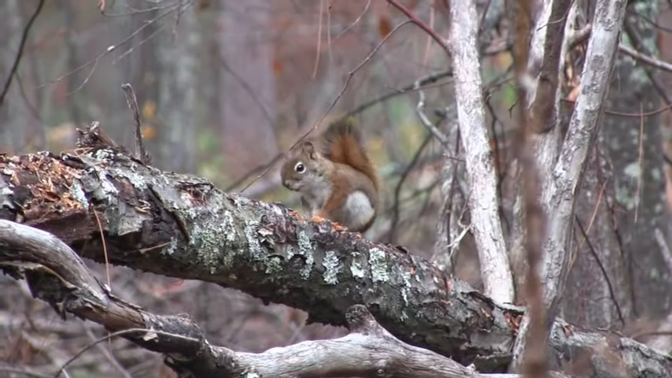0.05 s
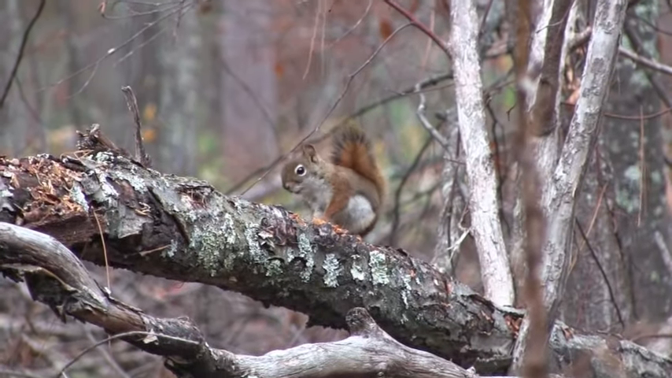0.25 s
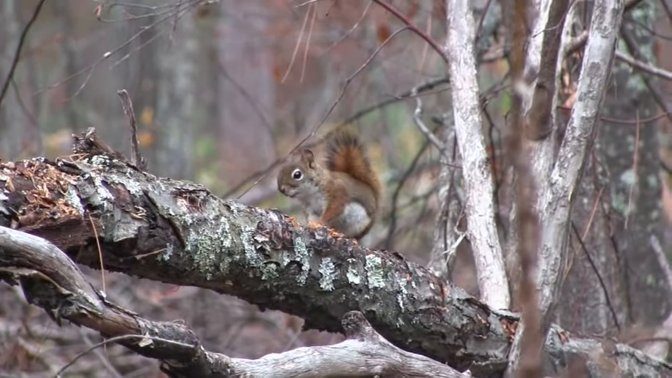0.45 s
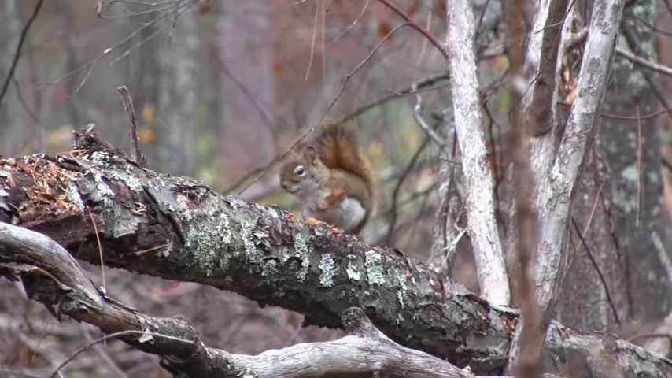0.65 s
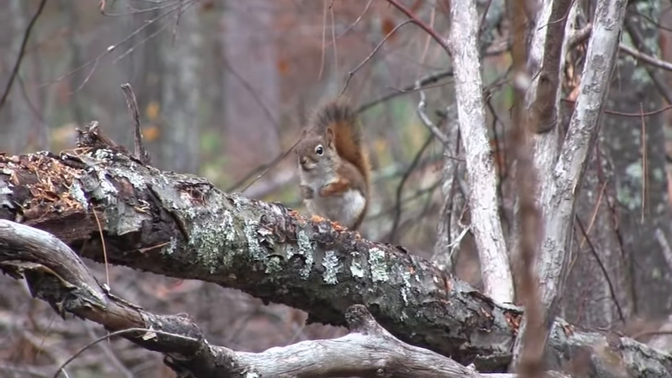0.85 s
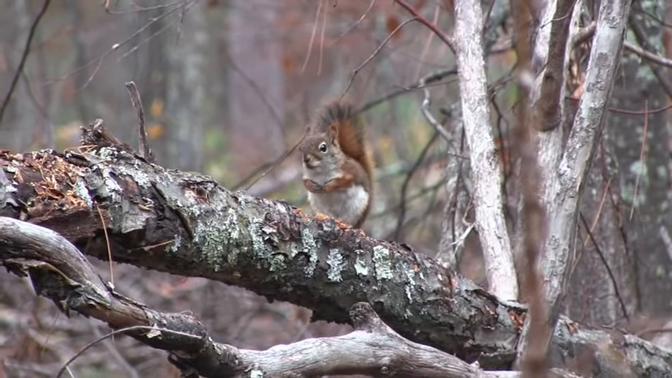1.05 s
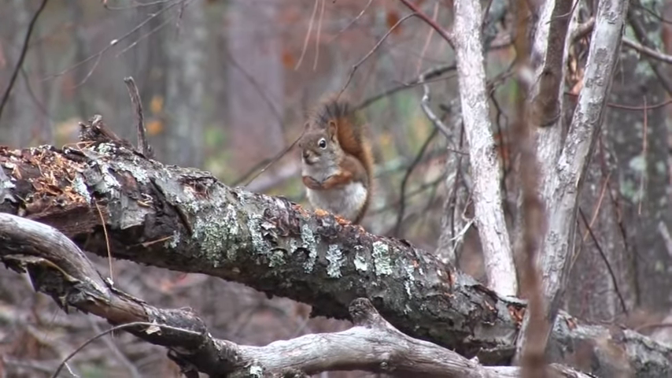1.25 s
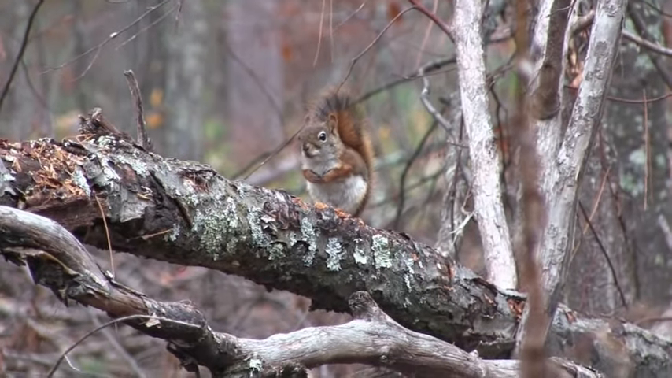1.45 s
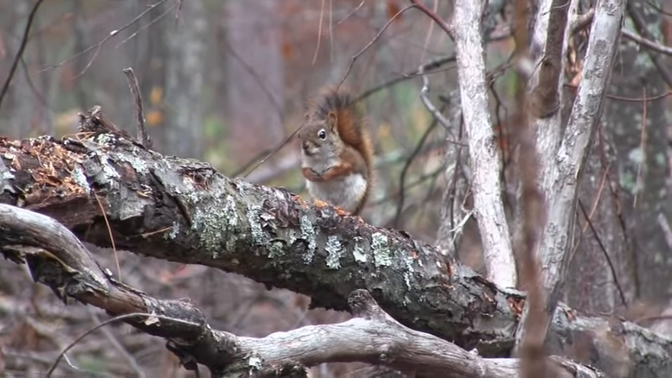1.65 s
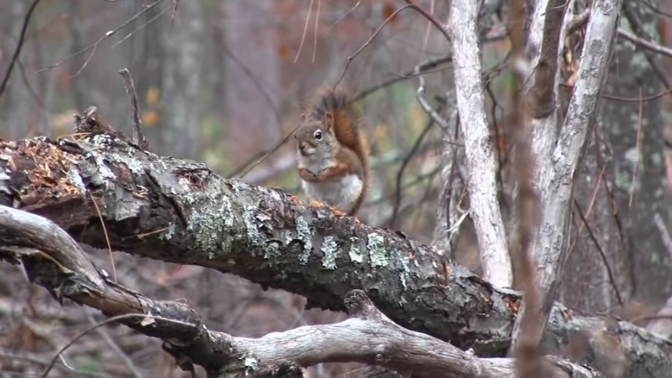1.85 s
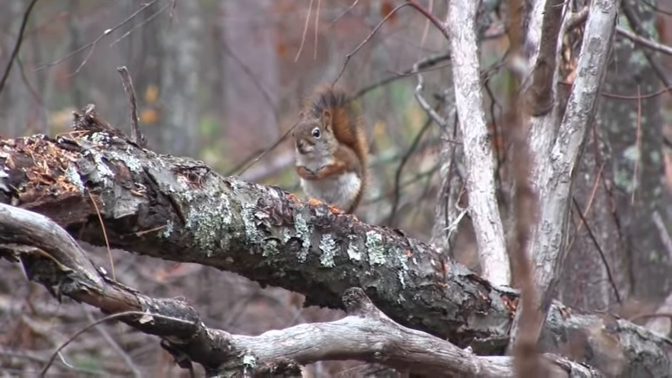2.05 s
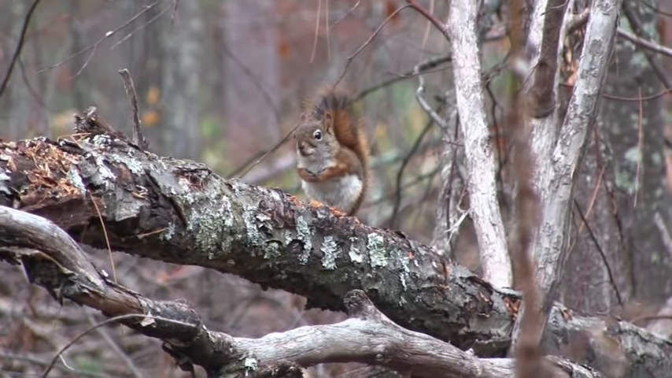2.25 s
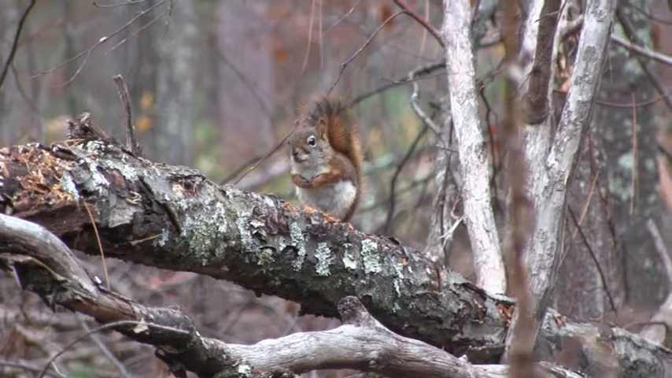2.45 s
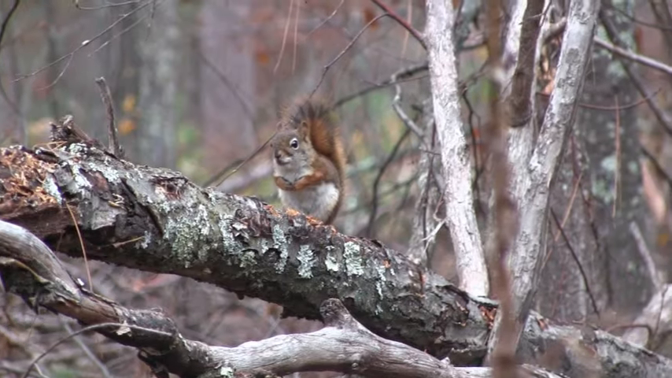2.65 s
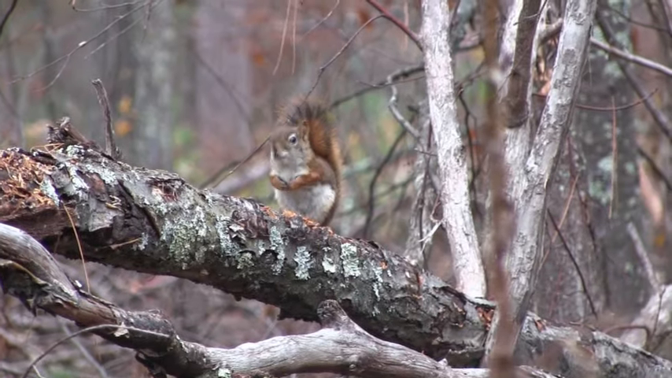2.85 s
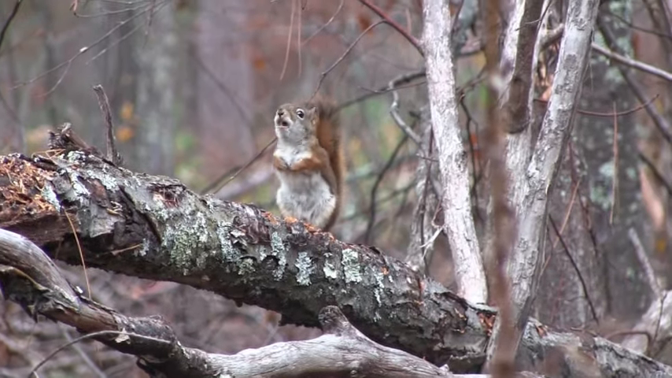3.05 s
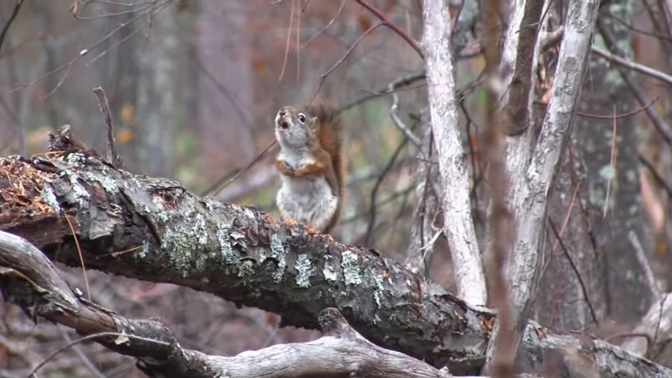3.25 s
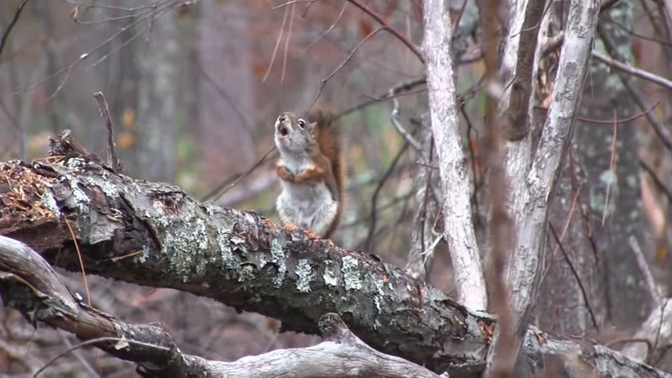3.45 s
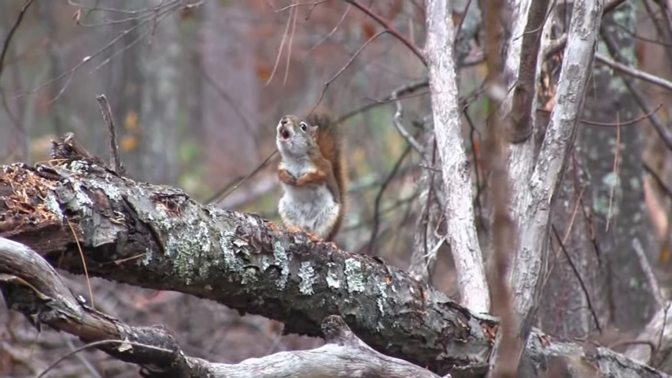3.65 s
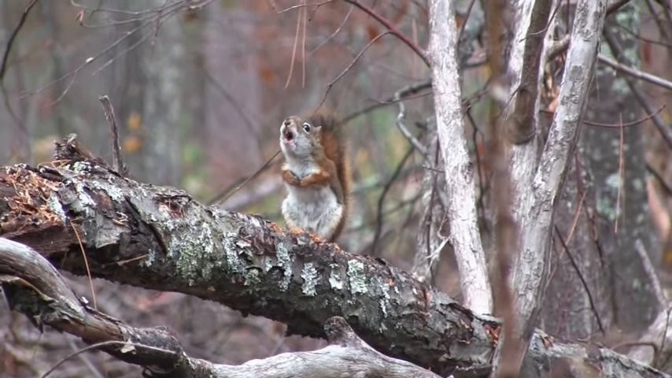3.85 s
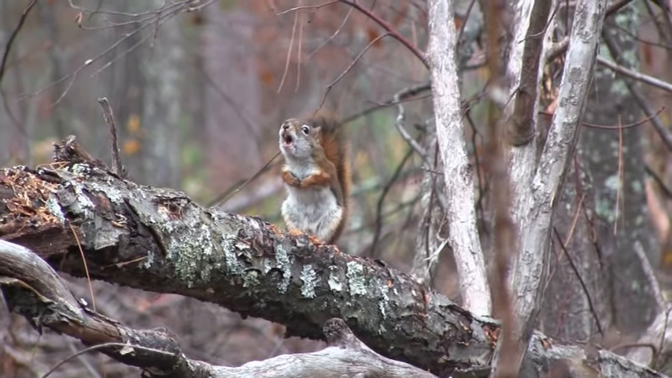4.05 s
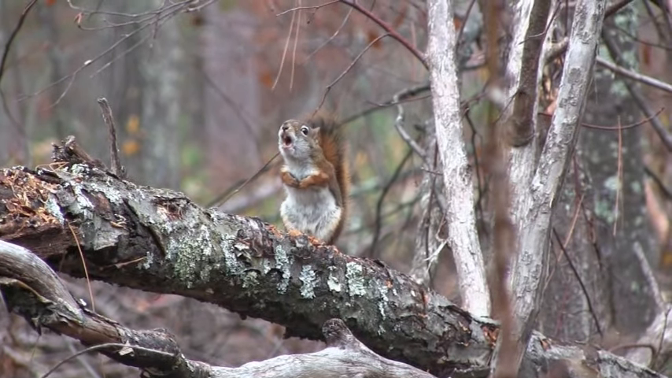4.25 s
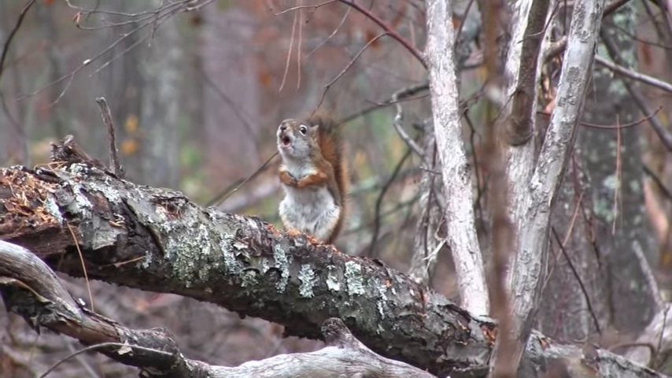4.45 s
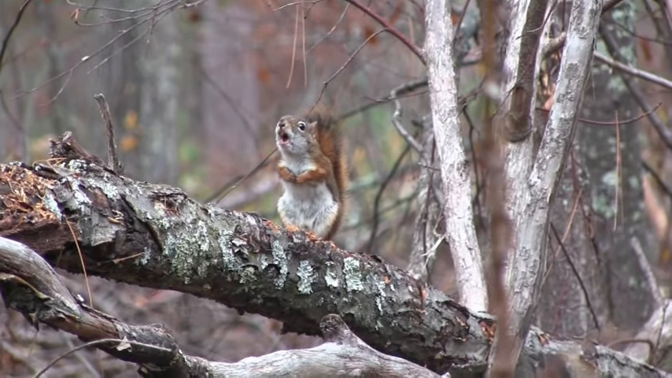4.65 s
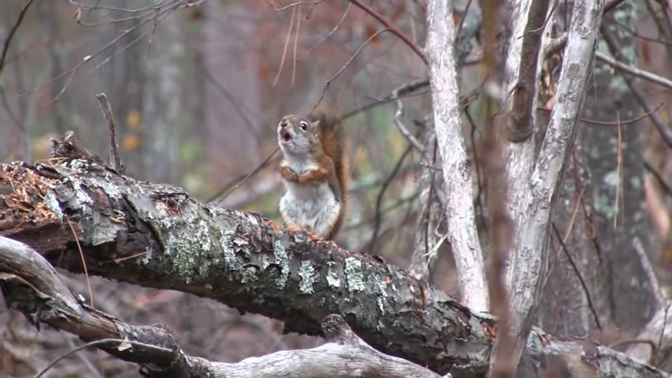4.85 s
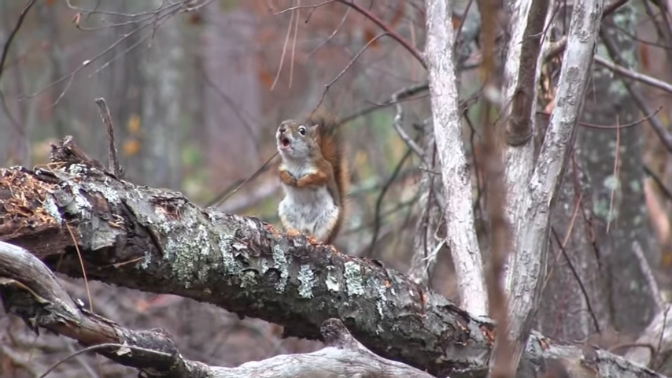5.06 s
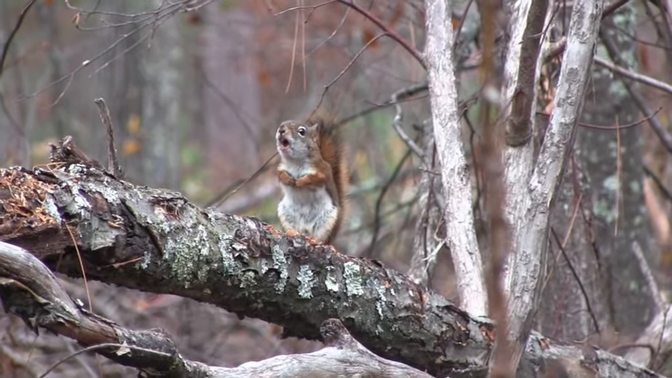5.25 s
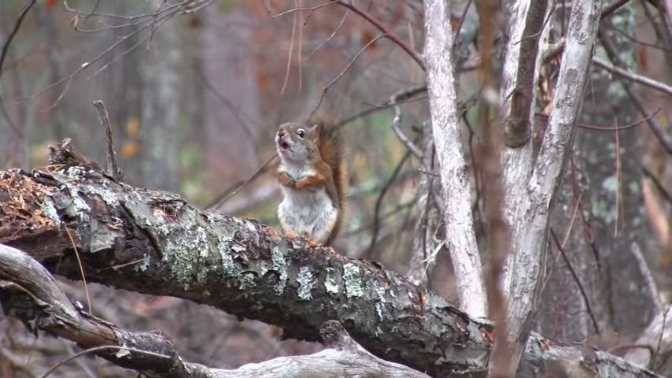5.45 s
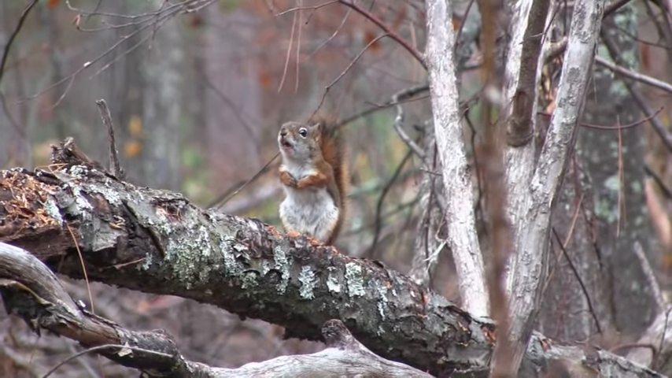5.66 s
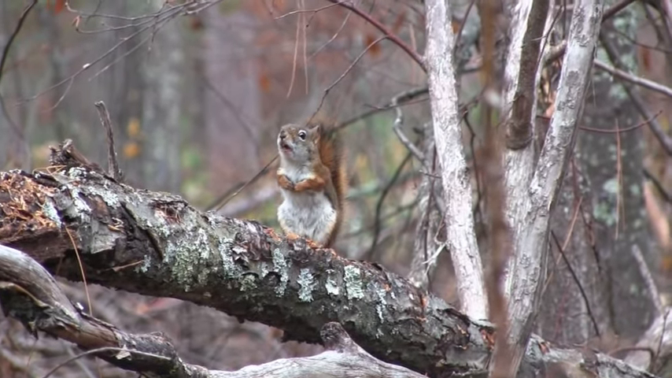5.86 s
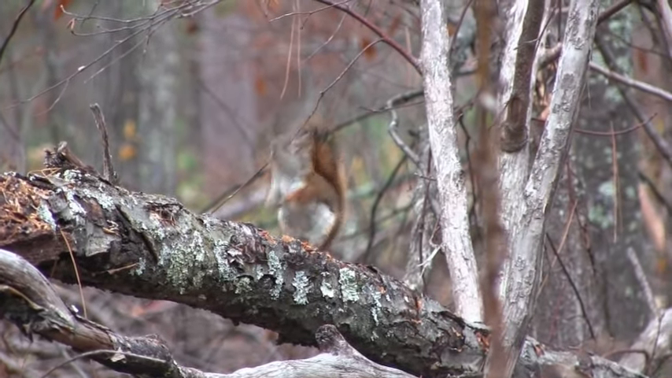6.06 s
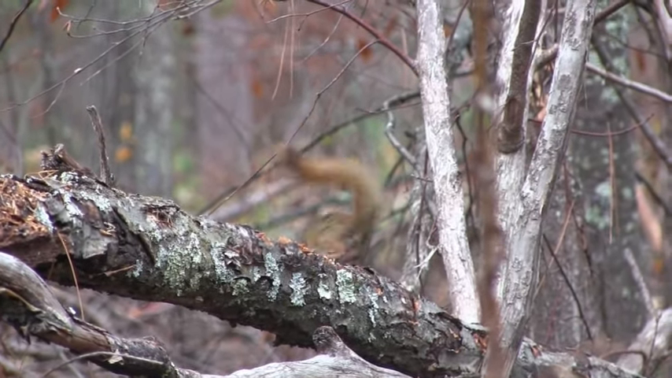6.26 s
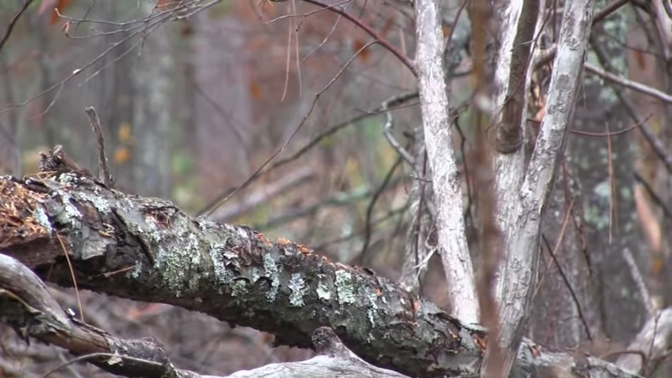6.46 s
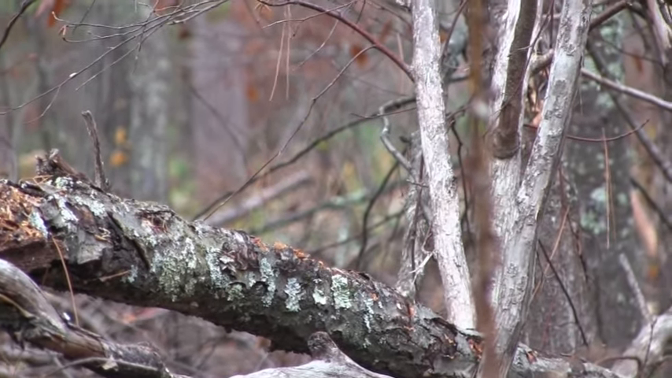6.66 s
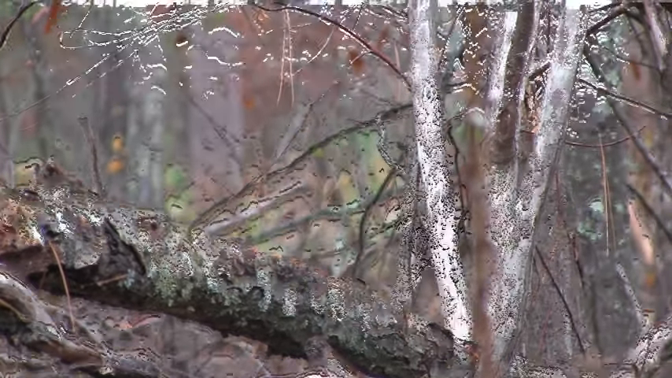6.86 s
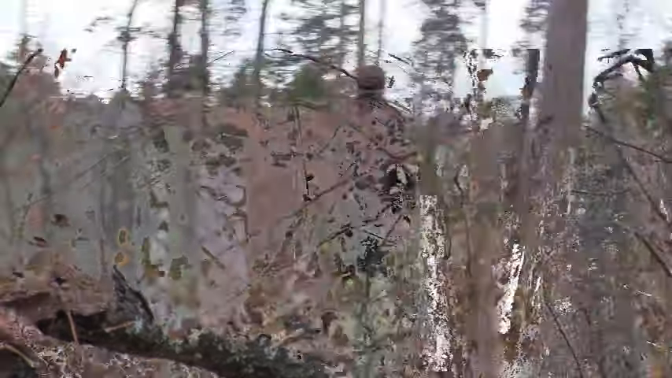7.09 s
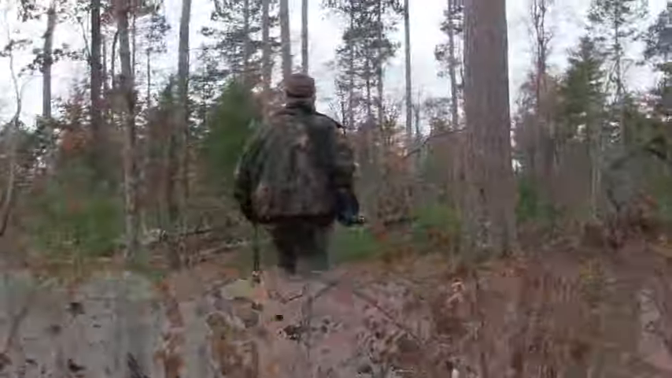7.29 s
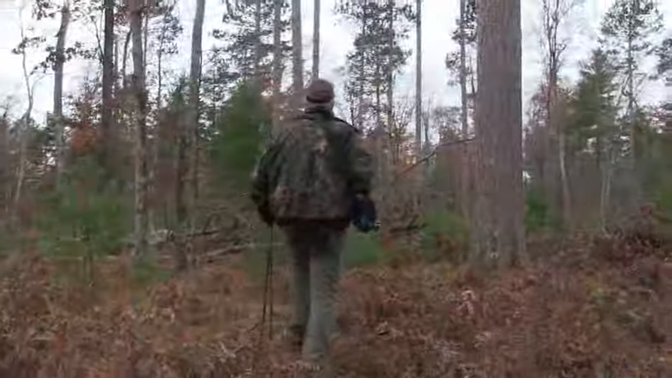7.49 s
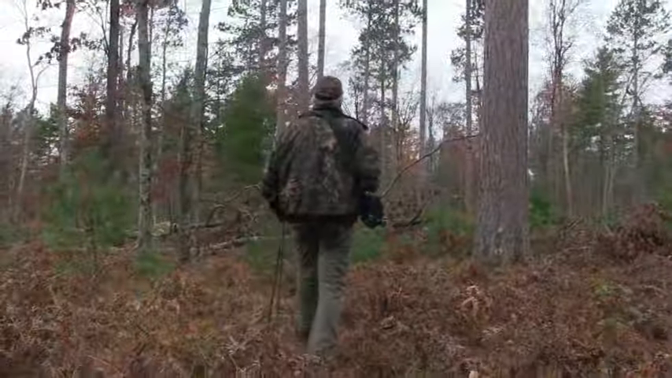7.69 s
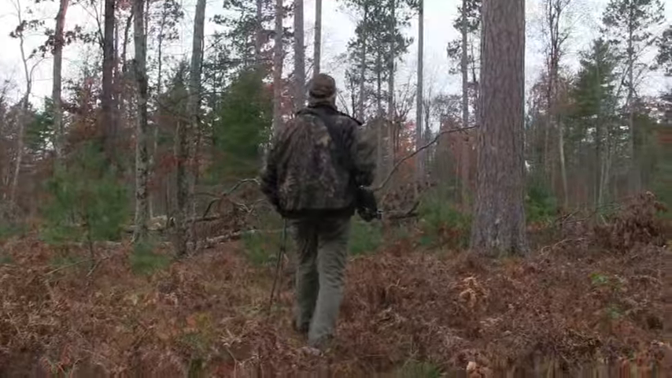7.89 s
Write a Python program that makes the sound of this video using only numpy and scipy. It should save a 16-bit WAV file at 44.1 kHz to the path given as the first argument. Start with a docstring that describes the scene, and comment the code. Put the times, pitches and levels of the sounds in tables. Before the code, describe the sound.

For the first three seconds there is only a soft, wide forest hush, mostly low-mid air, with a couple of tiny bird peeps near 0 and 0.8 s and very faint thin whistles at 0.2 and 1.1 s. At 3.16 s a squirrel in the centre starts a dry, buzzy rattle: very short falling squeaks around 1 kHz with bright rasping overtones, roughly 30 per second. It swells to full loudness by 3.6 s, holds, eases slowly to about 24 per second by 4.9 s, then slows sharply, the last separate notes ending at 5.6 s. Trees echo it briefly. Hush follows, with a tiny click at 6.5 s. From 6.9 s boots tread dully through swishing, crackling dry ferns, with light knocks and clicks around 7.1 s, a click at 7.27 s, hollow rubbing from 7.55 s, a faint peep at 7.6 s, and a loud hollow double knock at 7.72 s with a sharp crack.

```python
"""A red squirrel on a log rattles: short falling notes swell, then slow down, and the forest echoes them.
Behind it are the soft hush of the forest, made of coloured noise, and a few faint whistled bird calls.
Each squirrel note is a train of uneven pulses and puffs of air through a closing throat and a mouth.
Near the end a walker wades through dry ferns, all shaped noise and crackling grains,
with hollow knocks close to the microphone, made of ringing modes, and sharp clicks and cracks of noise."""
import sys
import numpy as np
from scipy import signal
from scipy.fft import rfft, irfft
from scipy.io import wavfile
from scipy.ndimage import uniform_filter1d

SR = 44100
rng = np.random.default_rng(int(sys.argv[2]) if len(sys.argv) > 2 else 0)


def unload_wav(signal):
    """Save mono or channel-first audio to the path in sys.argv[1] as 16-bit WAV at rate SR, clipped to [-1, 1]."""
    wavfile.write(
        sys.argv[1],
        SR,
        np.round(np.clip(np.atleast_2d(signal).T, -1, 1) * 32767).astype(np.int16),
    )


N = 349575
TIME = np.arange(N) / SR


def gain_of(db):
    """Decibels to amplitude."""
    return 10 ** (np.asarray(db) / 20)


def evened(x):
    """Scales to rms 1."""
    return x / np.sqrt(np.mean(x ** 2) + 1e-20)


def read(points, hz):
    """Reads a spectrum on a log-frequency axis."""
    f, value = np.transpose(points)
    return np.interp(np.log(hz + 1), np.log(f + 1), value)


def follow(rows, t):
    """Reads every column of a curve table at t."""
    s, *columns = np.transpose(rows)
    return [np.interp(t, s, c) for c in columns]


def add(mix, s, sound):
    """Mixes a sound in at time s, dropping whatever falls outside the mix."""
    start = round(s * SR)
    sound = sound[..., max(-start, 0):]
    part = mix[..., max(start, 0):][..., :sound.shape[-1]]
    part += sound[..., :part.shape[-1]]


def panned(left_minus_right_db):
    """Left and right gains."""
    return gain_of([[left_minus_right_db / 2], [-left_minus_right_db / 2]])


def coloured(x, points, size=1024):
    """Causal minimum-phase filter with the given spectrum."""
    hz = abs(np.fft.fftfreq(size, 1 / SR))
    log_gain = np.log(gain_of(read(points, hz)))
    spectrum = np.exp(np.conj(signal.hilbert(log_gain)))
    taps = np.fft.ifft(spectrum).real[:size // 2]
    return signal.fftconvolve(x, taps)[:len(x)]


def resonate(x, hz, width_hz):
    """A resonance of gain 1 that follows the curve hz."""
    turn = np.exp(2j * np.pi * np.cumsum(hz) / SR)
    r = np.exp(-np.pi * width_hz / SR)
    return 2 * (turn * signal.lfilter([1 - r], [1, -r], x / turn)).real


def noise(points, likeness, patchy_db, size=1024):
    """Stereo noise of rms 1 with a spectrum, a left-right likeness and drifting patches."""
    hz = np.fft.rfftfreq(size, 1 / SR)
    hop = size // 4
    a, b, c, d, patches = rng.standard_normal((5, N // hop + 5, len(hz)))
    patches = uniform_filter1d(patches, size=12, axis=0)
    patches = evened(uniform_filter1d(patches, size=12, axis=1))
    same = np.clip(read(likeness, hz), -1, 1)
    left = a + 1j * b
    right = same * left + np.sqrt(1 - same ** 2) * (c + 1j * d)
    z = np.array([left, right]) * gain_of(read(points, hz) + patchy_db * patches)
    return evened(signal.istft(z.swapaxes(1, 2), nperseg=size, noverlap=size - hop)[1][:, :N])


# spectrum of the forest hush: hz [Hz], density_db [dB per Hz]
HUSH_COLOUR = [(15, -55), (25, -27), (70, -12.5), (130, -14), (307, -2.5), (382, -1), (620, -2),
               (791, -3.5), (1390, -8.5), (1820, -13), (3580, -15.5), (3880, -15.5), (11700, -28.5),
               (14600, -34.5), (15800, -43)]
# how alike the hush is at left and right: hz [Hz], likeness [-1 to 1]
HUSH_LIKENESS = [(60, 0.75), (150, 0.79), (380, 0.83), (950, 0.53), (2380, 0.52), (5980, 0.37),
                 (15000, 0.7)]
# lean of the hush: hz [Hz], left_minus_right_db [dB]
HUSH_LEAN = [(60, -0.19), (240, 0.0), (950, -0.099), (3770, -1.7), (15000, -0.042)]


def hush(level_db=-48):
    """Air in distant treetops: broad noise, slightly different at the two sides."""
    air = noise(HUSH_COLOUR, HUSH_LIKENESS, patchy_db=1.0)
    lean_db = read(HUSH_LEAN, np.fft.rfftfreq(N, 1 / SR))
    sides = gain_of([lean_db / 2, -lean_db / 2])
    return gain_of(level_db) * irfft(rfft(air) * sides, N)


# faint bird calls: start_s [s], length_s [s], level_db [dB rms], start_hz [Hz], end_hz [Hz],
# overtone_db [dB]
BIRD_CALLS = [(-0.012, 0.059, -53, 3050, 2530, -4), (.22, 0.41, -69, 3580, 3500, -32),
              (0.788, 0.022, -55, 2620, 2520, -9), (1.1, 0.31, -69, 3516, 3510, -30),
              (7.597, .1, -61, 3330, 3280, -30)]


def birds():
    """Thin wavering whistles with two overtones, which droop at the end."""
    out = np.zeros(N)
    for start_s, length_s, level_db, start_hz, end_hz, overtone_db in BIRD_CALLS:
        u = np.arange(0, length_s, 1 / SR) / length_s
        waver = 0.011 * evened(uniform_filter1d(rng.standard_normal(len(u)), size=100))
        pitch_hz = (start_hz + (end_hz - start_hz) * u ** 3) * (1 + waver)
        phase = 2 * np.pi * np.cumsum(pitch_hz) / SR
        overtones = np.sin(2 * phase) + np.sin(3 * phase)
        tone = np.sin(phase) + gain_of(overtone_db) * overtones
        add(out, start_s, gain_of(level_db) * evened(tone * np.sin(np.pi * u)))
    return out


def smeared(x, spread_s=0.000595, spacing_hz=2600, smear_db=-9, smear_s=0.00049):
    """The throat holds some overtones back longer; teeth and cheeks blur each note a little differently."""
    hz = np.fft.rfftfreq(len(x), 1 / SR)
    delay_s = spread_s * np.sin(np.pi * hz / spacing_hz) ** 2
    # the running sum of the delay over frequency is the phase lag
    x = irfft(rfft(x) * np.exp(-2j * np.pi * np.cumsum(delay_s) * hz[1]), len(x))
    t = np.arange(SR // 500) / SR
    trail = rng.standard_normal(len(t)) * np.exp(-t / smear_s)
    trail = coloured(trail, [(1000, -14), (5000, -7.5), (8000, 1.5)])
    trail *= gain_of(smear_db) / np.linalg.norm(trail)
    return x + signal.fftconvolve(x, trail)[:len(x)]


def vocal_folds(hz, rough, shimmer=0.23, jitter=0.018):
    """Uneven pulses of up to 20 harmonics, blended with puffs of air as the voice roughens."""
    wobble, flutter, air = rng.standard_normal((3, len(hz)))
    hz = hz * (1 + jitter * evened(uniform_filter1d(wobble, size=30)))
    turns = np.cumsum(hz) / SR + rng.random()
    order = np.arange(1, 21)[:, None]
    audible = order * hz < SR / 2
    pulses = evened((np.cos(2 * np.pi * order * turns) * audible).sum(0))
    pulses = evened(smeared(pulses)) * (1 + shimmer * evened(uniform_filter1d(flutter, size=40)))
    # air hisses while the folds are open, mostly in the treble
    opening = 0.62 + np.exp(-(turns % 1) / 0.72)
    puffs = evened(coloured(air * opening, [(1000, -9.0), (4000, -4.5), (9000, 7), (13000, -3.5)]))
    return (1 - rough) * pulses + 1.63 * rough * puffs


# pitch within one note: share_of_note [0-1], pitch_factor [ratio]
PITCH_ARCH = [(0, 1.06), (.22, 1.09), (.5, 1), (.7, .95), (1, .9)]
# the throat as a note starts: hz [Hz], gain_db [dB]
OPEN_THROAT = [(500, -22.5), (1000, -2), (1250, -4.5), (1700, -14), (2300, -8), (3400, -1), (4500, 1),
               (6400, -2.5), (8000, 0.5), (10500, -8), (12900, 3.5), (14500, -12), (15700, -7)]
# the throat as a note ends: hz [Hz], gain_db [dB]
SHUT_THROAT = [(500, -23), (930, -4), (1150, -3), (1800, -23), (2900, -10.5), (3900, -19), (4800, -2),
               (6300, -13), (7200, -5), (11000, -4), (12900, 4), (14500, -7.5), (15700, -15)]
# the mouth over the rattle, about which each note varies: time_s [s], resonance_hz [Hz],
# resonance_db [dB], brightness_db [dB], roughness [0-1]
MOUTH_SHAPE = [(3.16, 9200, 17, -3, 0), (3.23, 8640, -3, -3, 0), (3.28, 5300, 2, -3.5, 0.26),
               (3.45, 5380, 10, 0, 0.37), (3.9, 5230, 11.5, 0, 0.37), (4.4, 5010, 10, 3.5, 0.29),
               (5.05, 4940, 4.5, 2, 0.14), (5.35, 4250, 4.5, 1.5, 0.1), (5.62, 4070, -7, 4.5, 0.1)]


def note(s, length_s, level_db, pitch_hz, depth, mouth_width_hz=600, mouth_glide=0.34,
         rise=0.37, fall=0.39, spill=.13, vary_db=1.35):
    """One squeak: the folds sound through a throat that closes as the pitch falls, then the mouth."""
    # u is the share of the note; the swell spills over both ends
    u = np.arange(-spill * length_s, (1 + 2 * spill) * length_s, 1 / SR) / length_s
    mouth_hz, mouth_db, bright_db, rough = follow(MOUTH_SHAPE, s)
    # the mouth never opens quite the same way twice
    mouth_db, bright_db = np.array([mouth_db, bright_db]) + vary_db * rng.standard_normal(2)
    arch = follow(PITCH_ARCH, u)[0] ** depth
    swell = np.clip((u + spill) / rise, 0, 1) * np.clip((1 + spill - u) / fall, 0, 1)
    drive = vocal_folds(pitch_hz * arch, rough) * np.sin(np.pi / 2 * swell) ** 2
    shut = np.clip((u - .3) / .5, 0, 1)
    voice = coloured(drive * (1 - shut), OPEN_THROAT) + coloured(drive * shut, SHUT_THROAT)
    # the mouth resonance slides down with the pitch and rings most late in the note
    late = np.clip((u - .1) / .5, 0, 1)
    ring = resonate(voice * late, mouth_hz * arch ** mouth_glide, mouth_width_hz)
    voice += gain_of(mouth_db) * ring
    # a brighter mouth moves weight from the lower treble to the upper
    tilt = [(5500, 0), (8000, -.7 * bright_db), (10500, bright_db), (13000, 0.24 * bright_db)]
    voice = coloured(voice, tilt)
    loudness = np.sqrt(np.mean(voice[(u > 0) & (u < 1)] ** 2))
    return s - spill * length_s, gain_of(level_db) * voice / loudness


# the rattle's tempo sags slowly, then collapses: time_s [s], tempo [notes per s]
RATTLE_TEMPO = [(3.16, 32.84), (3.19, 29.86), (3.4, 27.53), (3.62, 26.75), (4.0, 26.02), (4.3, 25.62),
                (4.92, 23.53), (5.15, 19.89), (5.25, 15.21)]
# the last notes straggle out of step: start_s [s]
STRAGGLING_NOTES = [5.3823, 5.447, 5.517, 5.5956]
# the voice swells and tires, and each note scatters about its pitch and arch: time_s [s],
# level_db [dB rms], pitch_hz [Hz], arch_depth [power]
VOICE_COURSE = [(3.16, -34.5, 1266, 1.3), (3.19, -33.5, 1100, 1.9), (3.225, -30, 1075, 1.62),
                (3.4, -26, 1046, 0.915), (3.65, -24.5, 1053, 1.06), (4.3, -24.5, 1029, 1.21),
                (4.8, -26.5, 1008, 1.49), (5.43, -27.6, 1022, 1.7), (5.6, -30.5, 915, 1.43)]
RATTLE_START_S, RATTLE_END_S = 3.1594, 5.34  # the notes in step lie between these
# a note's length at the full tempo, before the early cut; it stretches by a power as the tempo drops
NOTE_S, FULL_TEMPO_PER_S, STRETCH_POWER = .0168, 26, .37
# share cut from the first note, dying away as the voice warms up
CUT_SHORT, WARM_UP_S = .48, .11
PITCH_SCATTER, ARCH_SCATTER = 0.0079, .12  # chance from note to note, as shares


def squirrel():
    """The rattle: each note follows the last at the sagging tempo, and slower notes last longer."""
    starts = [RATTLE_START_S]
    while (s := starts[-1] + 1 / follow(RATTLE_TEMPO, starts[-1])[0]) < RATTLE_END_S:
        starts.append(s)
    out = np.zeros(N)
    for s in starts + list(STRAGGLING_NOTES):
        level_db, pitch_hz, depth = follow(VOICE_COURSE, s)
        length_s = NOTE_S * (FULL_TEMPO_PER_S / follow(RATTLE_TEMPO, s)[0]) ** STRETCH_POWER
        length_s *= 1 - CUT_SHORT * np.exp((RATTLE_START_S - s) / WARM_UP_S)
        pitch_hz *= 1 + PITCH_SCATTER * rng.standard_normal()
        depth *= 1 + ARCH_SCATTER * rng.standard_normal()
        add(out, *note(s, length_s, level_db, pitch_hz, depth))
    return out


def nearby(x, level_db, fade_s, count=24):
    """Close surfaces throw back a scatter of quick echoes, different for each side."""
    taps = np.zeros((2, SR // 40))
    at = rng.integers(10, taps.shape[1], (2, count))
    at[:, :count // 2] //= 6  # half of them crowd in early
    echoes = rng.choice([-1, 1], at.shape) * np.exp(-at / SR / fade_s)
    np.put_along_axis(taps, at, echoes, 1)
    taps /= np.linalg.norm(taps, axis=1, keepdims=True)
    return gain_of(level_db) * signal.oaconvolve(x * np.ones((2, 1)), taps, axes=1)[:, :N]


# how long the forest rings: hz [Hz], t60_s [s]
FOREST_RING = [(200, 0.9), (1000, 0.93), (5000, 0.23), (10000, 0.53), (16000, 0.3)]
# colour of that ring: hz [Hz], gain_db [dB]
FOREST_TONE = [(200, 3), (1000, 2), (3000, 7.5), (5000, -0.5), (7000, 2.5), (11000, -2), (16000, -6)]


def forest(x, level_db, same=0.77, first_db=5, first_s=.04):
    """Trunks scatter the sound: the nearest strongly, then a tail whose treble dies sooner than its bass."""
    a, b = rng.standard_normal((2, SR)) * (rng.random((2, SR)) < .1)
    sides = [a, same * a + np.sqrt(1 - same ** 2) * b]
    hz, t, z = signal.stft(sides, SR, nperseg=256)
    decay = np.exp(-np.log(1000) * t / read(FOREST_RING, hz)[:, None])
    tone = gain_of(read(FOREST_TONE, hz)[:, None] + first_db * np.exp(-t / first_s))
    z *= decay * tone * np.clip(t / 0.0048, 0, 1)
    tail = signal.istft(z, SR, nperseg=256)[1]
    tail /= np.linalg.norm(tail[0])
    return gain_of(level_db) * signal.fftconvolve(x[None], tail, axes=1)[:, :N]


# sharp clicks and cracks, some of them the bright edge of a knock: start_s [s], level_db [dB],
# left_minus_right_db [dB]
SHARP_CLICKS = [(6.514, -50, 6), (7.073, -39, -2), (7.100, -33.5, -1), (7.274, -34, 0), (7.743, -24.5, 1)]
# colour of a click: hz [Hz], gain_db [dB]
CLICK_TONE = [(200, -6), (1000, 7.5), (2400, 6), (3500, 5), (4500, -5), (5600, -0.5), (8000, 5),
              (11000, -1), (15500, -14)]


def clicks(crack_s=0.0019, trail_s=0.01, trail_db=-15):
    """Sharp clicks and cracks: a short burst of noise with a fainter, longer trail."""
    out, t = np.zeros((2, N)), np.arange(SR // 10) / SR
    shape = np.exp(-t / crack_s) + gain_of(trail_db) * np.exp(-t / trail_s)
    for start_s, level_db, lean_db in SHARP_CLICKS:
        click = coloured(shape * rng.standard_normal(len(t)), CLICK_TONE)
        add(out, start_s, gain_of(level_db) * panned(lean_db) * click)
    return out


def surge(s, level_db, rise_db_per_s, fade_db_per_s):
    """A gain that climbs to its peak at time s and fades."""
    return gain_of(level_db - np.maximum(rise_db_per_s * (s - TIME), fade_db_per_s * (TIME - s)))


# the boots press on the soft ground: peak_s [s], level_db [dB]
BOOT_STEPS = [(6.92, -50), (7.06, -57), (7.12, -54), (7.325, -51), (7.595, -50), (7.73, -50)]
FOOT_RISE_DB_PER_S, FOOT_FADE_DB_PER_S = 1500, 220
# the fronds are swept aside: peak_s [s], level_db [dB], rise [dB per s], fade [dB per s]
FROND_SWEEPS = [(7.07, -49.5, 200, 60), (7.185, -44.5, 190, 40), (7.31, -44.5, 50.3, 33),
                (7.77, -45.5, 30, 60)]
# colour of the fronds: hz [Hz], density_db [dB per Hz]
FROND_COLOUR = [(150, -14), (400, -2), (800, 6.5), (1500, -1.5), (2500, -2), (4000, -2.5), (7000, -3),
                (10000, -5.5), (15500, -10)]
# colour of the boots: hz [Hz], density_db [dB per Hz]
BOOT_COLOUR = [(25, -14), (70, -7), (150, 3), (250, -2.5), (500, -18), (1200, -30.5), (4000, -60)]
# colour of the hollow rubbing: hz [Hz], density_db [dB per Hz]
RUBBING_COLOUR = [(200, -26), (520, -13), (660, 1.5), (820, -0.5), (1000, -10.5), (2500, -21), (6000, -44)]
# dull tread and rubbing that go with every swish
TREAD_IN_SWISH_DB, RUB_IN_SWISH_DB = -11, -9


def ferns(crackles_per_s=500, crackle_db=-7):
    """Dry fronds swish and crackle over the dull tread of boots and a hollow rubbing."""
    sweep = np.max([surge(*row) for row in FROND_SWEEPS], axis=0)
    weight = np.max([surge(s, db, FOOT_RISE_DB_PER_S, FOOT_FADE_DB_PER_S) for s, db in BOOT_STEPS], axis=0)
    # a hollow rubbing starts suddenly between two sweeps and dies away
    rubbing = surge(7.55, level_db=-43.5, rise_db_per_s=600, fade_db_per_s=18)
    struck = rng.random((2, N)) < crackles_per_s / SR
    grains = struck * gain_of(4 * np.minimum(rng.exponential(1, (2, N)), 4))
    grains *= rng.choice([-1, 1], (2, N))
    # each side also hears the other's crackles at half strength
    crackle = evened(np.array([coloured(g, FROND_COLOUR) for g in grains + .5 * grains[::-1]]))
    swish = noise(FROND_COLOUR, [(300, 0.37), (1000, 0.31), (3000, 0.97), (12000, 0.78)], patchy_db=1.0)
    swish += gain_of(crackle_db) * crackle
    tread = noise(BOOT_COLOUR, [(50, .1), (200, 0.34)], patchy_db=1.5)
    rub = noise(RUBBING_COLOUR, [(500, 0.24), (1500, .3)], patchy_db=2.0)
    tread_gain = np.hypot(weight, gain_of(TREAD_IN_SWISH_DB) * sweep)
    rub_gain = np.hypot(rubbing, gain_of(RUB_IN_SWISH_DB) * sweep)
    return sweep * swish + tread_gain * tread + rub_gain * rub


# hollow knocks close to the microphone: start_s [s], level_db [dB], left_minus_right_db [dB]
HOLLOW_KNOCKS = [(7.0715, -33, -5), (7.0738, -30.5, 0.5), (7.124, -38, 2), (7.548, -36.5, -1),
                 (7.7160, -9, -4), (7.7198, -13.5, 1)]
# modes the knocks ring with: pitch_hz [Hz], level_db [dB], t60_s [s], left_minus_right_db [dB]
KNOCK_MODES = [(135, -18.5, 0.12, -1), (168, -14.5, 0.12, 7), (240, -21, 0.061, 4), (703, -4.5, 0.036, 4),
               (803, 0, 0.025, -5), (1074, -5, .038, -6), (1660, -4.5, 0.015, 6), (2100, -11.5, 0.017, -5),
               (2880, -23, 0.013, 0)]
# the dense thud of each blow: hz [Hz], gain_db [dB]
THUD_TONE = [(60, -37), (200, -9), (480, -20), (750, -2), (1080, 2), (1350, -14), (2300, -9), (3200, -24),
             (8000, -36), (15000, -46)]


def knocks(contact_s=0.00059, lag_s=0.00016, thud_db=-7, thud_s=0.0057, low_hz=130):
    """Blunt blows thud and set short modes ringing; the sound reaches the right side first."""
    out, t = np.zeros((2, N)), np.arange(SR // 4) / SR
    t = np.maximum(t - np.array([[lag_s], [0]]), 0)
    ring = np.zeros(t.shape)
    for hz, db, t60_s, lean_db in KNOCK_MODES:
        decay = np.exp(-np.log(1000) * t / t60_s)
        ring += gain_of(db) * panned(lean_db) * decay * np.sin(2 * np.pi * hz * t)
    for start_s, level_db, lean_db in HOLLOW_KNOCKS:
        thud = np.array([evened(coloured(z, THUD_TONE)) for z in rng.standard_normal(t.shape)])
        blow = ring + gain_of(thud_db) * thud * np.exp(-t / thud_s)
        blow *= 1 - np.exp(-t / contact_s)  # blunt contact softens the onset
        add(out, start_s, gain_of(level_db) * panned(lean_db) * blow)
    # a high-pass keeps the knocks free of deep bass
    return signal.sosfilt(signal.butter(3, low_hz, "highpass", fs=SR, output="sos"), out)


def scene():
    """The squirrel straight ahead, the walker after it, the forest around both."""
    background = hush() + birds()
    rattle = squirrel()
    calls = rattle + nearby(rattle, level_db=-10.5, fade_s=0.0049) + forest(rattle, level_db=-15.5)
    blows = clicks() + knocks()
    blow_echoes = nearby(blows, level_db=-9, fade_s=0.0073) + forest(blows.mean(0), level_db=-27)
    return background + calls + ferns() + blows + blow_echoes


def record(dry, edge_hz=15650):
    """The band limit of the recorder: a steep low-pass without delay."""
    taps = signal.firwin(401, edge_hz, window=("kaiser", 9), fs=SR)
    return signal.oaconvolve(dry, taps[None], "same")


dry = scene()
out = record(dry)
unload_wav(out)
```